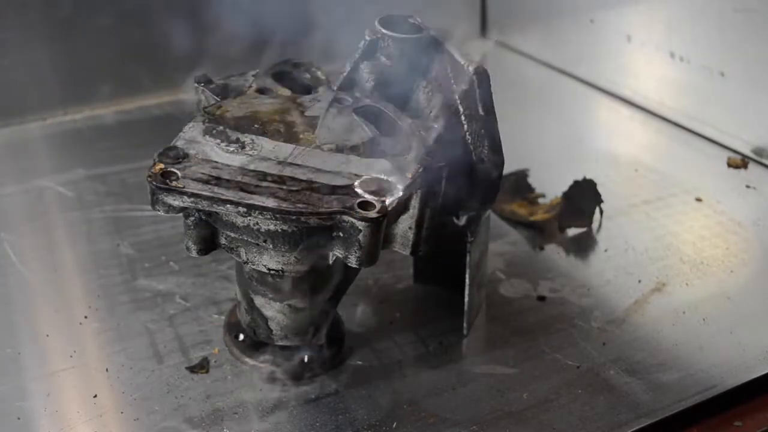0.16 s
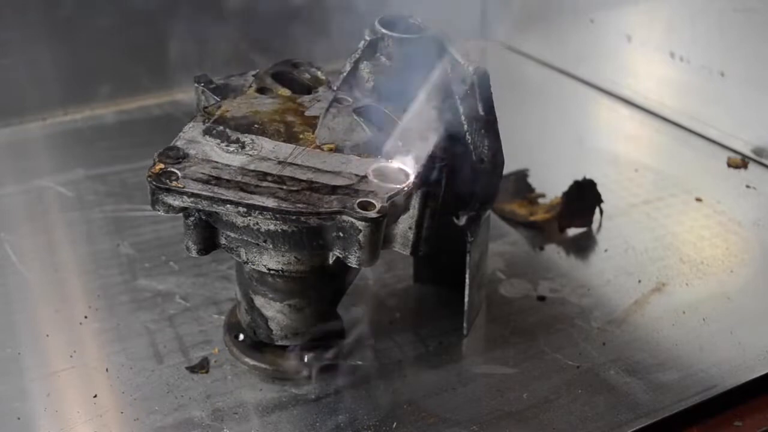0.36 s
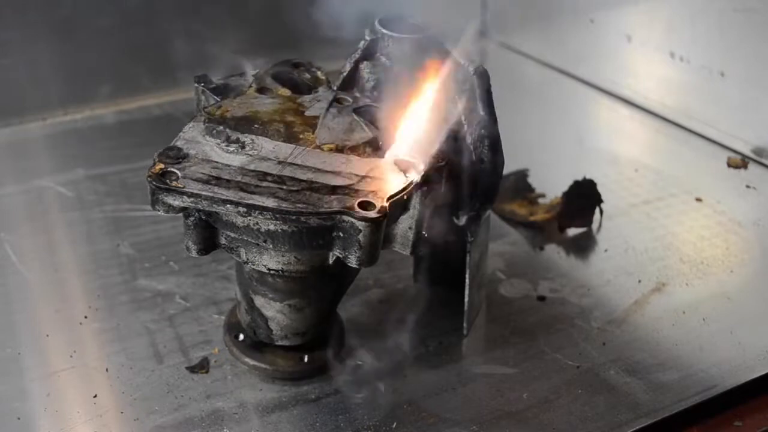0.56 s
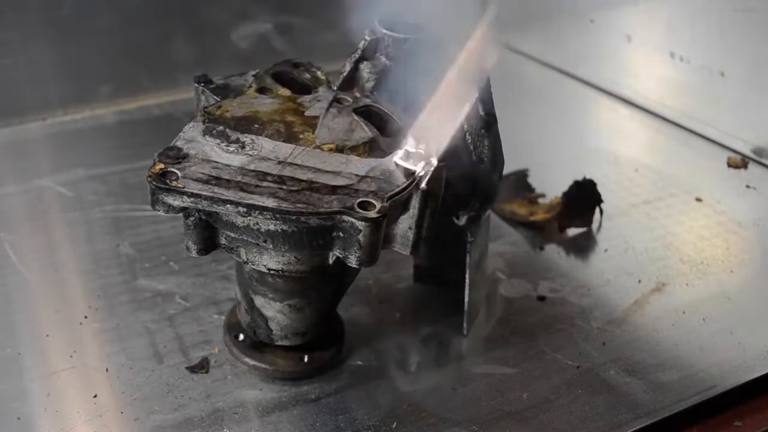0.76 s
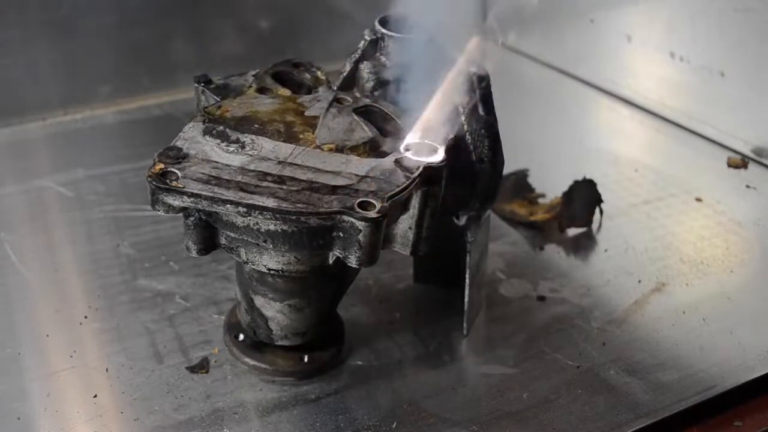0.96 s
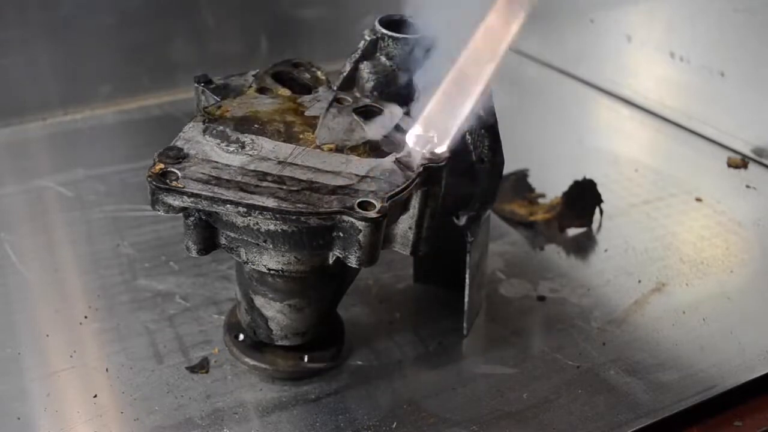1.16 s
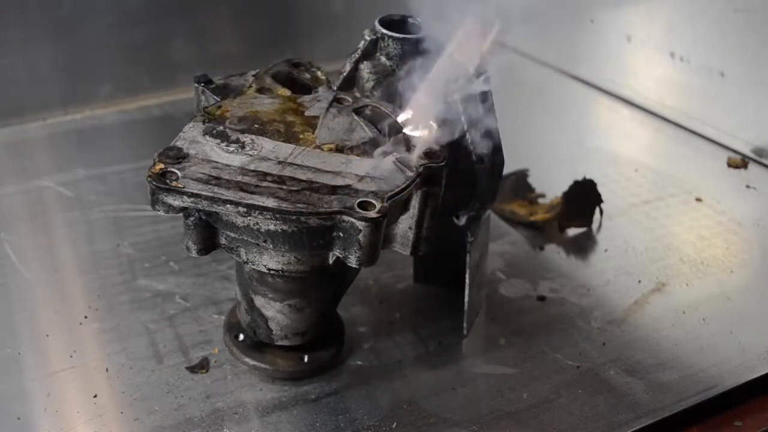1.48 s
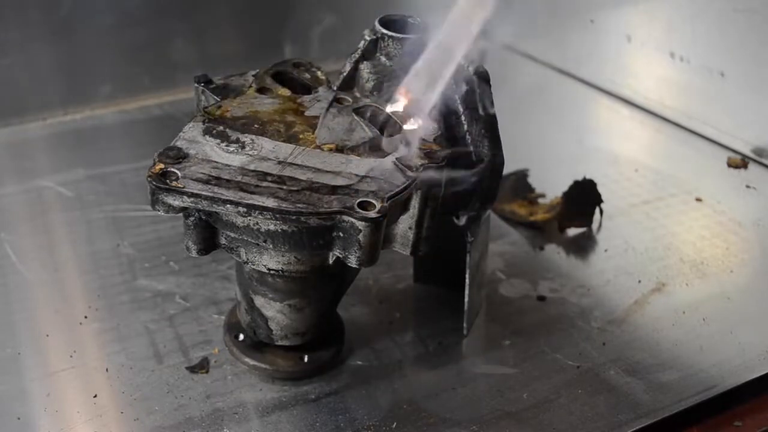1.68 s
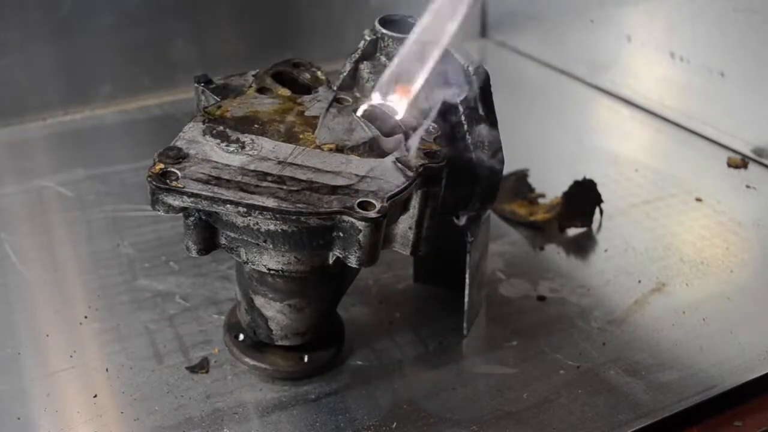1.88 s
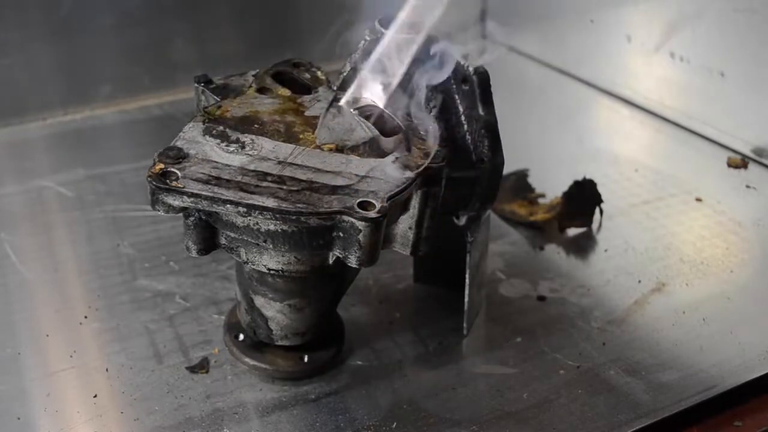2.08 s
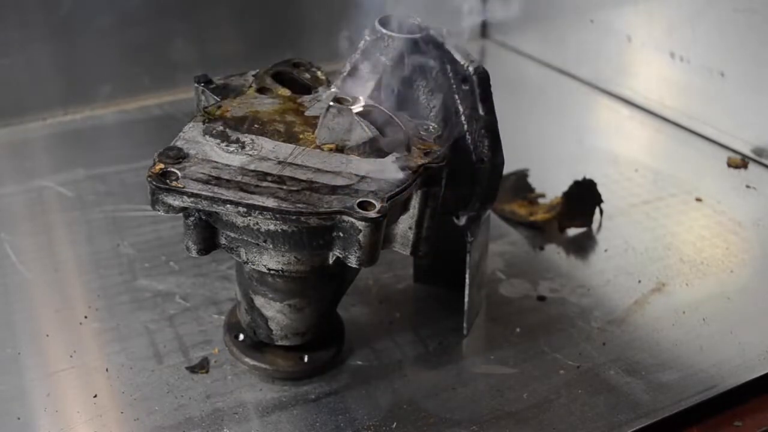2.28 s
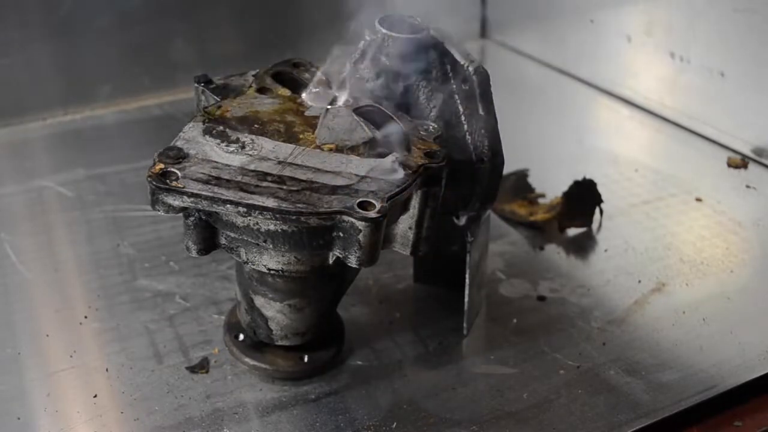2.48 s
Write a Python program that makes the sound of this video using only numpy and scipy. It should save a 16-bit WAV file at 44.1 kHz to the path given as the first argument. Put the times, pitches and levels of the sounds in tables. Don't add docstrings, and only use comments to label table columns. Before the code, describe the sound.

A laser cleaning beam buzzes on grimy metal: a raspy pulse about two hundred times a second, topped by a piercing whine near ten kilohertz. It begins moderately, dips around 0.2-0.35 seconds, then surges from 0.4 to 0.8. It continues unevenly, crackly and fluttering, with small ticks clustering near 0.3-0.6 and 1.85-2.4, weakening after 2.3. Quiet extractor air and faint hum sit behind, with short bench reflections.

```python
import sys
import numpy as np
from scipy import signal
from scipy.fft import rfft, irfft
from scipy.io import wavfile
from scipy.ndimage import uniform_filter1d, map_coordinates

SR = 44100
rng = np.random.default_rng(int(sys.argv[2]) if len(sys.argv) > 2 else 0)


def bounce(signal):
    frames = np.transpose(np.atleast_2d(signal))
    limited = np.clip(frames, -1, 1)
    pcm = np.round(limited * 32767).astype(np.int16)
    wavfile.write(sys.argv[1], SR, pcm)


def ratio(d):
    e = np.asarray(d, float) / 20
    return 10 ** e


N = 116865
SHOT_HZ, RING_HZ = 9999.0, 205.3
FADE_S = 0.04

# f/Hz, level/dB
HUM = [
    (100, -83.5),
    (300, -101),
    (920, -86),
]
# f/Hz, density/dB
AIR = [
    (30, -35),
    (100, -26),
    (500, -10),
    (1100, 32),
    (3000, 13),
    (6000, -23),
    (15000, -4),
]

# start t/s, end t/s, start position/turn, end position/turn
PATCHES = [(.36, .45, .35, .41), (.44, .6, .43, .45), (.6, .67, .49, .51), (.66, .77, .47, .5),
           (.38, .56, .99, .99), (.62, .78, .11, .03), (.58, .78, .99, .93), (.96, 1.06, .6, .6),
           (1.13, 1.4, .74, .9), (.92, 1.12, .93, .88), (.92, 1.12, .36, .3), (1.2, 1.4, .15, .15),
           (1.42, 1.54, .61, .63), (1.58, 1.9, .05, .16), (1.87, 2.04, .6, .45), (2.01, 2.23, .47, .32),
           (2.1, 2.24, .56, .53), (2.22, 2.4, .46, .4), (2.16, 2.33, .2, .11), (2.05, 2.2, .75, .8),
           (-.1, .15, .18, .05), (.77, .92, .1, .1), (2.45, 2.55, .27, .25), (2.42, 2.55, .8, .7),
           (.44, .58, .32, .3)]
# whine level/dB, thump re whine/dB
PATCH_LEVELS = [(-27, -0.5), (-22.5, 2.5), (-25, 1.5), (-27, 3.5), (-29, -6), (-28.5, -4.5), (-26, -12.5),
                (-27.5, -7.5), (-29.5, -3), (-33, -8), (-40, -8), (-39.5, -10), (-29.5, -4.5), (-29.5, -5),
                (-26.5, 0), (-24.5, 1.5), (-27, -2), (-36.5, -4), (-33, 3), (-33, -22), (-38, -2),
                (-36, -3), (-43, -2), (-40, -18.5), (-26, -3)]
# start t/s, end t/s, start position/turn, end position/turn
EDGES = [(.08, .18, .96, .94), (.1, .18, .89, .86), (0, .18, .69, .5), (.1, .32, .3, .08),
         (.38, .52, .21, .18), (.76, .93, .49, .56), (1.05, 1.42, .55, .56), (1.04, 1.2, .27, .13),
         (.95, 1.15, .2, .06), (1.54, 1.78, .59, .48), (1.77, 2.05, .48, .32), (1.42, 1.73, .75, 1),
         (1.84, 2, .21, .29), (2, 2.13, .33, .2), (1.95, 2.2, .07, .1), (2.2, 2.32, .19, .15),
         (2.2, 2.32, -.02, .05), (2.36, 2.5, .52, .41), (.7, .78, .92, .89), (2.15, 2.21, .28, .28)]
# whine level/dB, thump re whine/dB
EDGE_LEVELS = [(-43, 5), (-30.5, -2), (-34.5, -5), (-38, 5), (-30.5, -13.5), (-30.5, -1.5), (-33.5, 0.5),
               (-33, 2.5), (-32, -2), (-27.5, 1.5), (-28.5, -1.5), (-33, 1.5), (-30, 0), (-41.5, -3),
               (-35, -2.5), (-27.5, -5), (-31, -15.5), (-44, 3), (-28, -4), (-23.5, 4.5)]
# start t/s, end t/s, start position/turn, end position/turn
STEPS = [
    (.09, .17, .88, .86),
    (.42, .54, .46, .48),
    (.66, .76, .49, .5),
    (1.43, 1.46, .58, .58),
    (1.55, 1.88, .57, .41),
    (1.5, 1.72, .81, .98),
    (1.6, 1.9, .04, .24),
    (2.22, 2.32, -.01, .05),
    (2.37, 2.48, .52, .43),
    (2.49, 2.56, .7, .64),
]
# whine level/dB, thump re whine/dB
STEP_LEVELS = [
    (-29, 5.5),
    (-32.5, 3.5),
    (-37, 5),
    (-37, 18.5),
    (-35, -5.5),
    (-37, -22),
    (-42, 0),
    (-37, 8),
    (-33, 4),
    (-46, 5),
]
# start t/s, end t/s, start position/turn, end
RIBS = [(.42, .54, .47, .49), (.66, .76, .5, .51), (.9, 1.15, .28, .06), (1.1, 1.45, .56, .56),
        (1.54, 1.77, .58, .47), (1.76, 1.98, .47, .35), (1.5, 1.74, .81, 1), (1.6, 1.93, .05, .26),
        (1.86, 1.98, .27, .27), (2.01, 2.08, .45, .42), (2.22, 2.32, 0, .06), (2.37, 2.49, .52, .42),
        (2.49, 2.56, .7, .64), (.09, .17, .89, .87), (2.16, 2.21, .3, .29), (1.15, 1.45, .5, .5),
        (.92, 1.02, .53, .54), (1.48, 1.6, .57, .56), (.28, .42, .33, .37), (.77, .86, .5, .54),
        (.84, 1.2, .54, .56)]
# f/Hz, level/dB
RIB_TONES = [(1700, -41.5), (1170, -40.5), (1020, -47), (1690, -54), (2210, -38.5), (2100, -43),
             (2030, -49), (2210, -43.5), (1440, -39.5), (1770, -41.5), (2720, -48.5), (1790, -49.5),
             (2570, -47.5), (2000, -48), (1720, -44.5), (205, -59), (410, -52.5), (400, -59.5),
             (1010, -52.5), (2750, -54.5), (1030, -51)]

# t/s, mottle level/dB, feature thump/dB, mottle thump/dB
SURFACE_STATE = [(0, -35.5, -12.5, -6.5), (0.068, -58, -23, -8.5), (0.141, -50, -6, -5.5),
                 (.2, -58, -14, -8.5), (.35, -53, -5, -12), (.44, -49.5, -2.5, -13.5), (.58, -53, -5, -10),
                 (0.662, -46, -3, -11), (.79, -50.5, -13.5, -10), (1.0, -52.5, -8, -13),
                 (1.3, -51.5, -8.5, -8), (1.42, -56, -12.5, -11.5), (1.65, -51, -7.5, -4.5),
                 (1.92, -53, -6, -10), (2.181, -46.5, -7, -11), (2.3, -50, -13.5, -8),
                 (2.35, -57.5, -18, -8), (2.65, -60, -24, -9)]
# cycles/turn, level/dB
WHINE_GRAIN = [
    (1, 15.5),
    (3, 11),
    (6, 2),
    (10, 1.5),
    (16, -10),
    (24, -22),
    (40, -11.5),
]
# cycles/turn, level/dB
THUMP_GRAIN = [
    (1, 6),
    (3, -5.5),
    (6, 4),
    (10, 0),
    (16, -3.5),
    (24, -11.5),
    (40, -10),
]
# t/s, level/dB
BURN = [(0, 0), (.2, -12.5), (.35, -1), (.44, 1), (.54, 0), (.6, -1.5), (.635, 3.5), (.78, -4.5),
        (.92, -0.5), (1.05, 0), (1.3, 1), (1.52, -3.5), (1.63, 0.5), (1.87, -1), (1.98, 1), (2.19, -1),
        (2.3, 0.5), (2.65, 4)]

# t/s, peak level/dB
MISSES = [(0.3225, -48.5), (0.3677, -43.5), (0.4145, -43), (0.4778, -61), (0.5267, -62), (0.5755, -52),
          (0.5902, -46), (0.7213, -42.5), (0.866, -51), (1.1852, -63), (1.8108, -74), (1.8562, -50),
          (1.903, -45), (1.955, -48), (1.969, -46), (2.016, -44), (2.0657, -40.5), (2.082, -46),
          (2.1291, -38.5), (2.1779, -39.5)]
# t/s, peak level/dB
HOLLOW_MISSES = [
    (2.2413, -39),
    (2.2897, -43.5),
    (2.3535, -52),
    (2.4024, -53),
]

ECHO_DELAYS_S = [
    0.0023,
    0.018,
    .009,
]
ECHO_LEVELS_DB = [
    -18.5,
    -25,
    -19,
]
# f/Hz, level/dB
MIC = [
    (25, -19),
    (60, -12),
    (100, -5.5),
    (170, 1),
    (11000, 0),
    (13500, 6.5),
]


def log_table(points, at):
    x, y = np.array(points).T
    return np.interp(np.log(at), np.log(x), y)


def workshop():
    t = np.arange(N) / SR
    f_hz = np.maximum(np.fft.rfftfreq(N, 1 / SR), 1)
    air = irfft(rfft(rng.standard_normal(N)) * ratio(log_table(AIR, f_hz)), N)
    hum = sum(ratio(db) * np.sqrt(2) * np.sin(2 * np.pi * hz * t) for hz, db in HUM)
    return ratio(-70) * air / air.std() + hum


def surface(hold_s, colour_db):
    turns, size = int(N / SR * RING_HZ) + 2, 128
    order = np.fft.fftfreq(size, 1 / size)
    map_s = np.arange(turns)[:, None] / RING_HZ
    r = np.exp(-1 / (hold_s * RING_HZ))
    spectrum = 0
    for turns_per_s in (-0.8, -0.3, 0.5):
        slow = rng.standard_normal((2, turns, size))
        for _ in range(2):
            slow = signal.lfilter([1 - r], [1, -r], slow, axis=1)
        drift = np.exp(-2j * np.pi * order * turns_per_s * map_s)
        spectrum = spectrum + (slow[0] + 1j * slow[1]) * drift
    chart = np.fft.ifft(spectrum * ratio(colour_db(np.maximum(abs(order), 1))), axis=1)

    turn = np.arange(N) / SR * RING_HZ
    where = [turn, turn % 1 * size]
    real = map_coordinates(chart.real, where, order=3, mode="grid-wrap")
    imag = map_coordinates(chart.imag, where, order=3, mode="grid-wrap")
    read = real + 1j * imag
    return read / np.sqrt(np.mean(abs(read) ** 2))


def beam_offset(t, row):
    start, end, first, last = row
    drift = (last - first) * (t - start) / (end - start)
    return (t * RING_HZ - first - drift + 0.5) % 1 - 0.5


def presence(t, row):
    start, end = row[:2]
    return (np.tanh((t - start) / FADE_S * 2) - np.tanh((t - end) / FADE_S * 2)) / 2


def features(rows, levels, width_turns, tail):
    phase_spread, phase_tilt, phase_drift = 0.3, 0.31, 1.255
    plain, phased = np.zeros(N), np.zeros(N, complex)
    draws = rng.uniform(-0.89, 1, (len(rows), 2))
    for row, (db, thump_db), (phase, slope) in zip(rows, levels, draws):
        first_n = max(int((row[0] - 4 * FADE_S) * SR), 0)
        last_n = min(int((row[1] + 4 * FADE_S) * SR), N)
        t = np.arange(first_n, last_n) / SR
        off = beam_offset(t, row)
        width = width_turns * np.where(off > 0, tail, 1)
        shape = np.exp(-0.5 * (off / width) ** 2) * presence(t, row)
        half_turns = phase_spread * phase + phase_tilt * slope * off + phase_drift * slope * t
        plain[first_n:last_n] += ratio(db + thump_db) * shape
        phased[first_n:last_n] += ratio(db) * shape * np.exp(1j * np.pi * half_turns)
    return plain, phased


def laser():
    mottle_db, mottle_low_db, mottle_hold_s = 8.5, 2.5, 0.066
    spatter_db, spatter_hz, shot_scatter = -27, 1450, 0.044
    push_cut_hz, thump_band_hz = 69, [360, 3340]
    t = np.arange(N) / SR
    state_s, *columns = np.transpose(SURFACE_STATE)
    mottle, thump, low_mottle = (ratio(np.interp(t, state_s, db)) for db in columns)

    patches = features(PATCHES, PATCH_LEVELS, 0.071, 0.72)
    edges = features(EDGES, EDGE_LEVELS, 0.024, 1.86)
    steps = features(STEPS, STEP_LEVELS, 0.011, 1.86)
    plain = patches[0] + edges[0] + steps[0]
    phased = patches[1] + edges[1] + steps[1]

    flutter = ratio(1.3 * surface(0.0028, lambda k: -9.0 * np.log2(k)).real)
    turn_mean = np.maximum(uniform_filter1d(plain, int(SR / RING_HZ)), 1e-4)
    mottle = mottle * abs(0.8 + plain / turn_mean) ** 0.45
    burn = ratio(np.interp(t, *np.transpose(BURN)))
    plain, phased = plain * burn, phased * burn

    mottle = mottle * flutter ** 0.99
    low_mottle = low_mottle * mottle
    fine = mottle * surface(mottle_hold_s, lambda k: log_table(WHINE_GRAIN, k))
    coarse = low_mottle * surface(mottle_hold_s, lambda k: log_table(THUMP_GRAIN, k)).real

    strength = phased * flutter + ratio(mottle_db) * fine
    scatter = 1 + shot_scatter * rng.standard_normal(N)
    whine = (strength * np.exp(2j * np.pi * SHOT_HZ * t)).real * scatter

    spatter = rng.standard_normal(N) * ratio(spatter_db) * np.sqrt(SR / spatter_hz)
    spatter = signal.sosfilt(signal.butter(1, spatter_hz, fs=SR, output="sos"), spatter)
    push = -plain * (flutter ** 0.65 + spatter) * thump
    push = push + ratio(mottle_db + mottle_low_db) * coarse
    push = signal.sosfiltfilt(signal.butter(2, push_cut_hz, "high", fs=SR, output="sos"), push)
    push = signal.sosfilt(signal.butter(1, thump_band_hz, "band", fs=SR, output="sos"), push)
    return whine + flutter * ribs() + push


def ribs():
    t, out = np.arange(N) / SR, np.zeros(N)
    for row, (hz, db) in zip(RIBS, RIB_TONES):
        cycles = beam_offset(t, row) / RING_HZ * hz
        ripple = np.exp(-0.5 * cycles ** 2) * np.cos(2 * np.pi * cycles)
        out -= ratio(db) * presence(t, row) * ripple
    return out


def clicks(rows, gain_db, band_hz, order):
    lag_s = 0.001147
    out = np.zeros(N)
    t_s, db = np.transpose(rows)
    out[((t_s + lag_s) * SR).astype(int)] = ratio(db + gain_db)
    return signal.sosfilt(signal.butter(order, band_hz, "band", fs=SR, output="sos"), out + 1e-18)


def misses():
    hollow_hz, hollow_width_hz = 4600, 590
    hollow_band_hz = [hollow_hz - hollow_width_hz / 2, hollow_hz + hollow_width_hz / 2]
    plain = clicks(MISSES, 19.5, [1690, 12100], order=1)
    hollow = clicks(HOLLOW_MISSES, 27, hollow_band_hz, order=2)
    return plain + hollow


def scene():
    beam = laser() + misses()
    echoes = np.zeros(N)
    for delay_s, db in zip(ECHO_DELAYS_S, ECHO_LEVELS_DB):
        echoes += ratio(db) * np.pad(beam, (int(delay_s * SR), 0))[:N]
    return (beam + echoes + workshop())[None]


def band_limit(x):
    return signal.sosfilt(signal.butter(12, 16030, fs=SR, output="sos"), x)


def record(dry):
    f_hz = np.maximum(np.fft.rfftfreq(N, 1 / SR), 1)
    mix = irfft(rfft(dry) * ratio(log_table(MIC, f_hz)), N)
    return band_limit(mix)


dry = scene()
out = record(dry)
bounce(out)
```